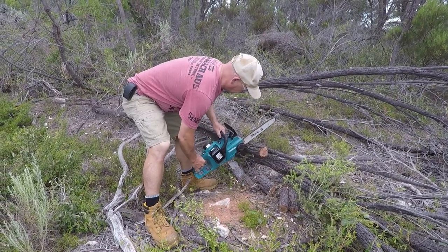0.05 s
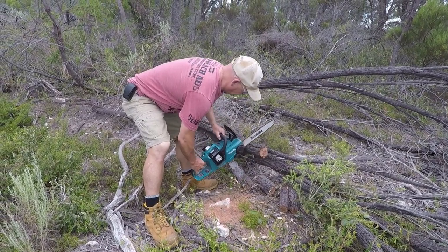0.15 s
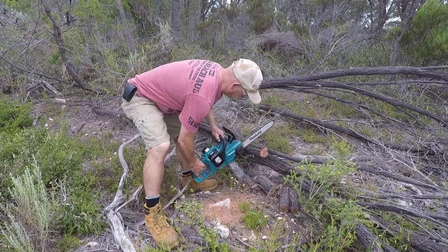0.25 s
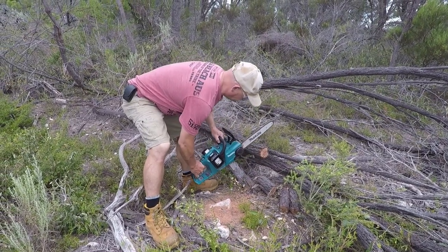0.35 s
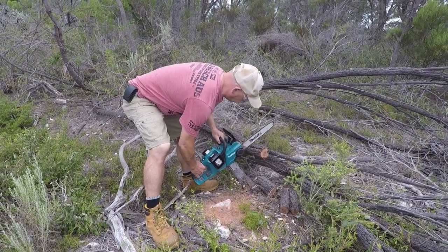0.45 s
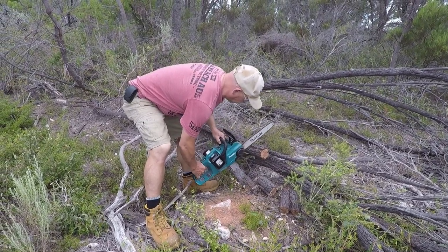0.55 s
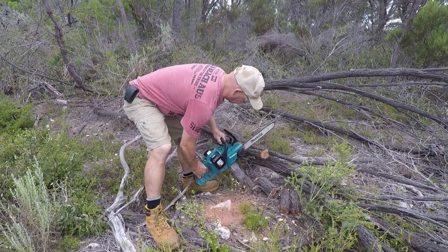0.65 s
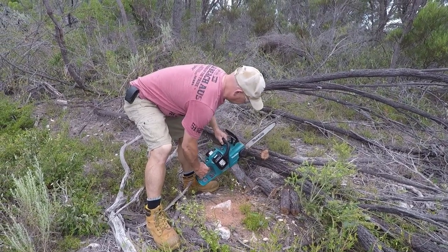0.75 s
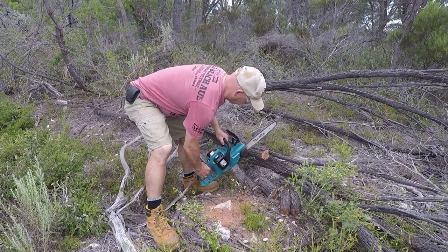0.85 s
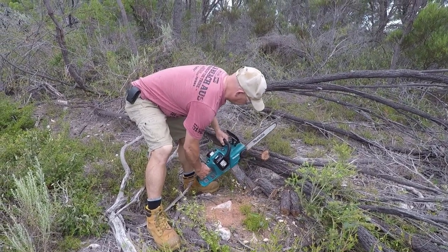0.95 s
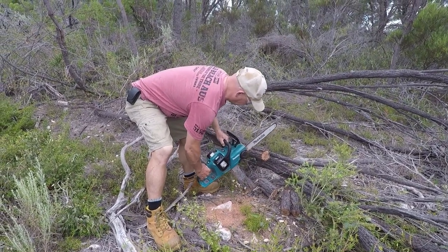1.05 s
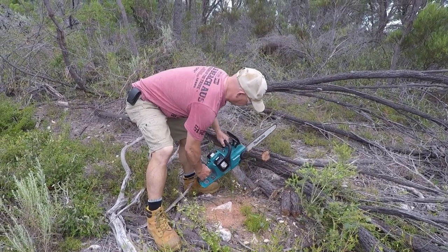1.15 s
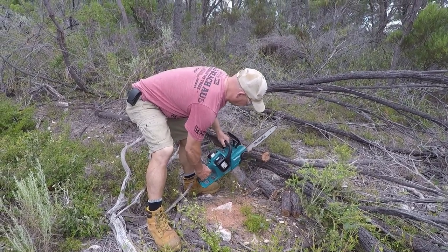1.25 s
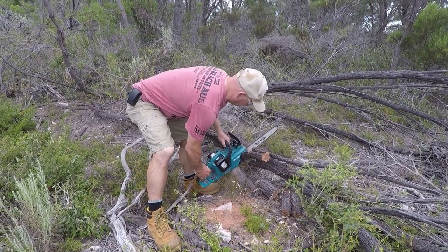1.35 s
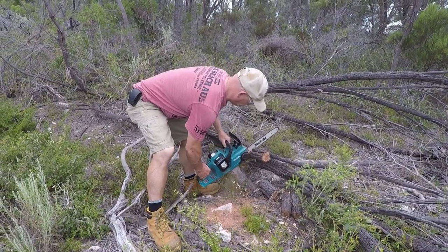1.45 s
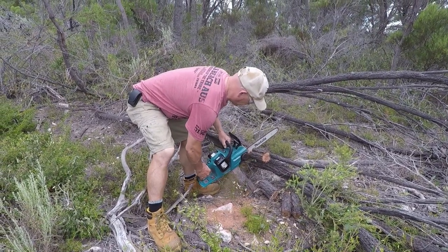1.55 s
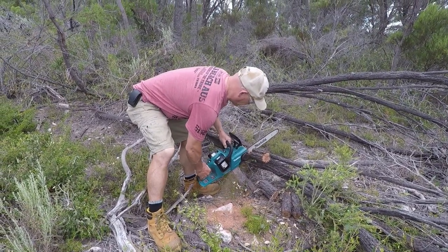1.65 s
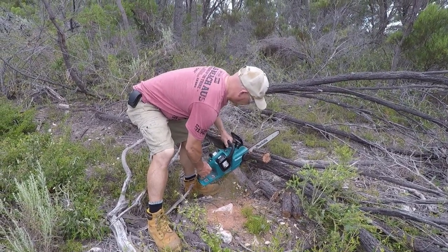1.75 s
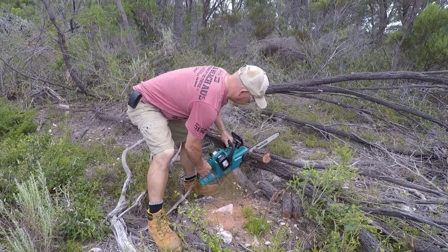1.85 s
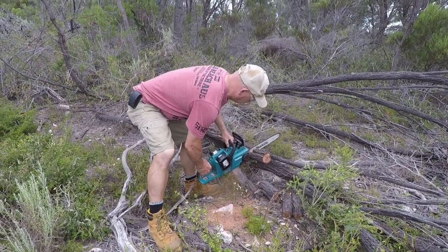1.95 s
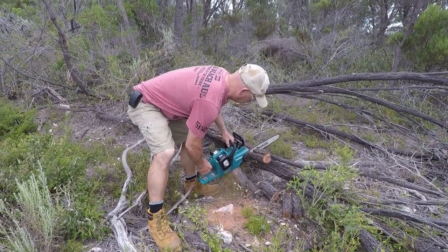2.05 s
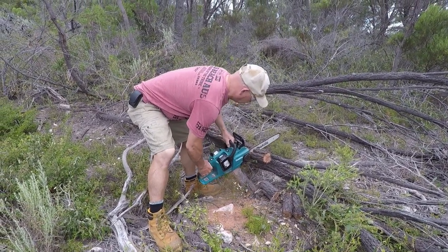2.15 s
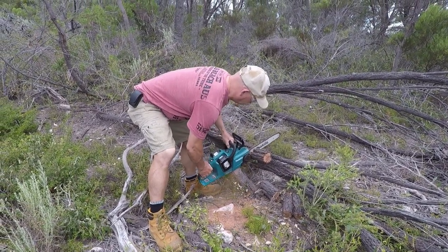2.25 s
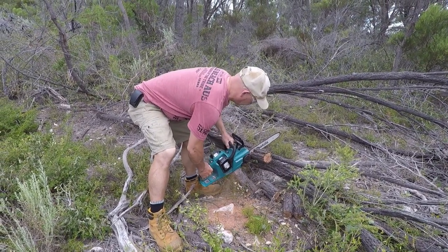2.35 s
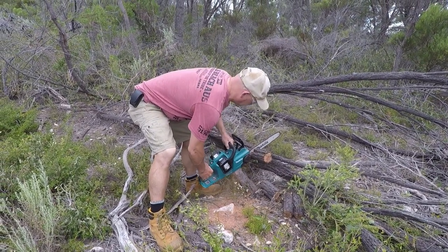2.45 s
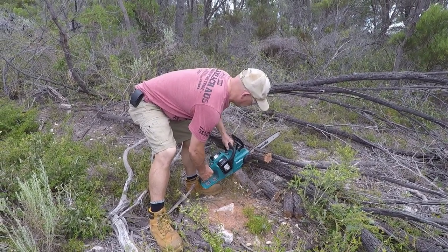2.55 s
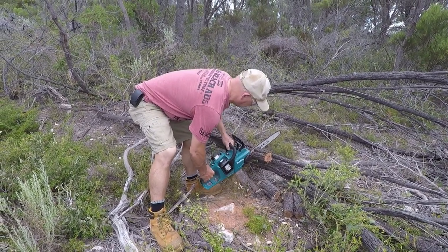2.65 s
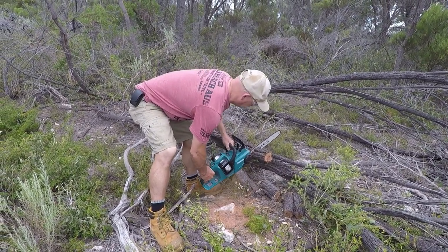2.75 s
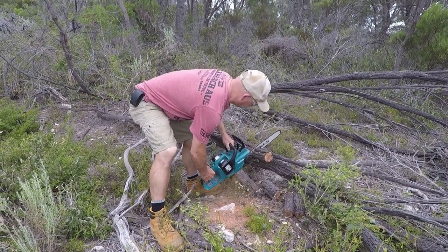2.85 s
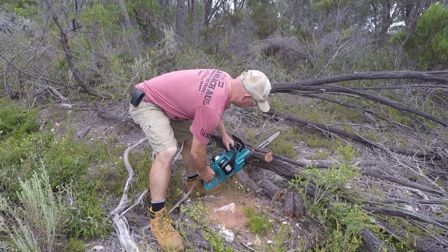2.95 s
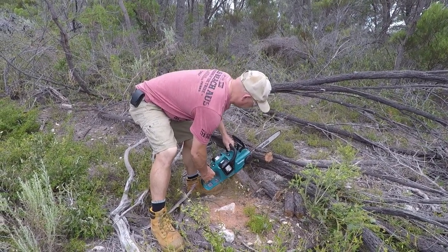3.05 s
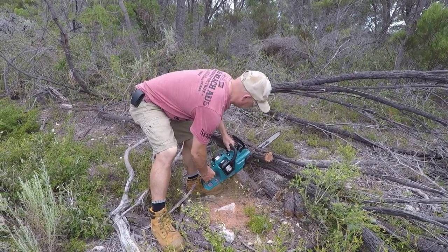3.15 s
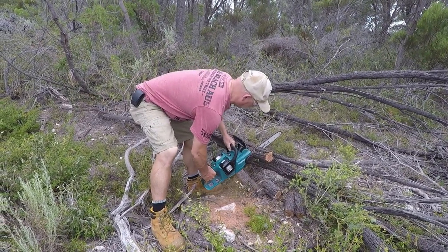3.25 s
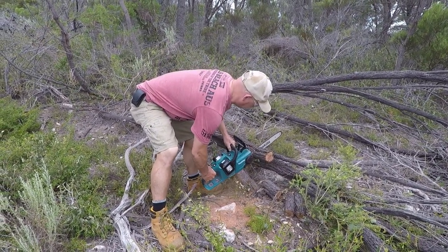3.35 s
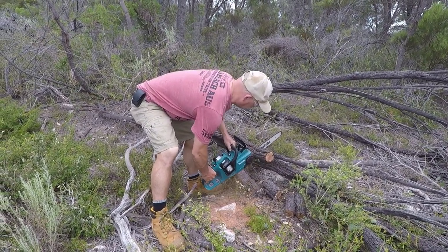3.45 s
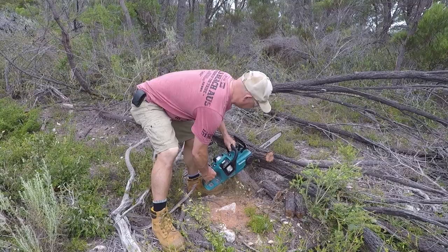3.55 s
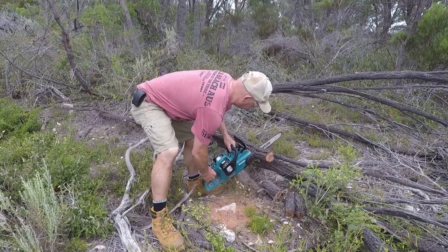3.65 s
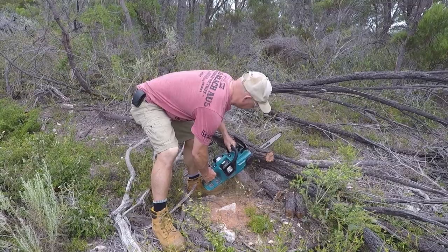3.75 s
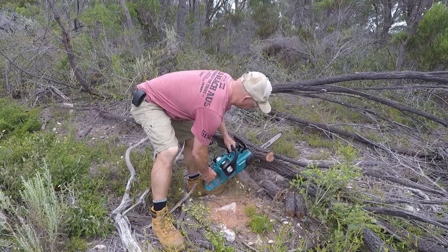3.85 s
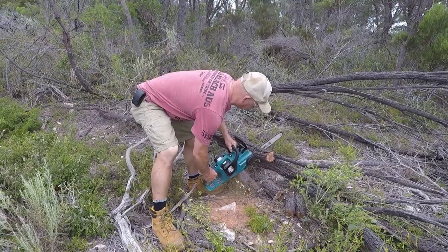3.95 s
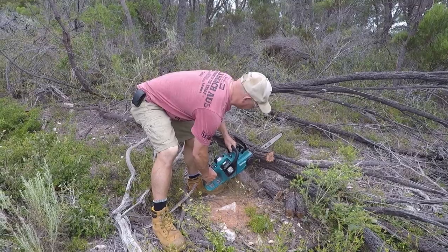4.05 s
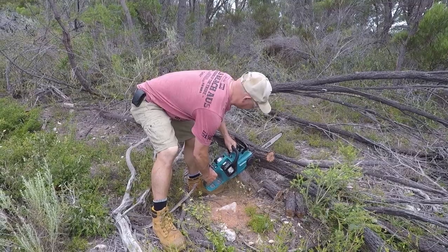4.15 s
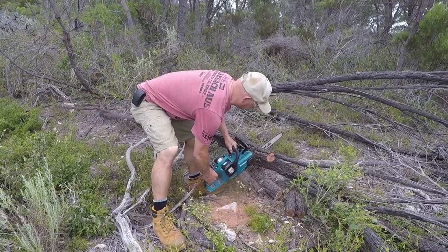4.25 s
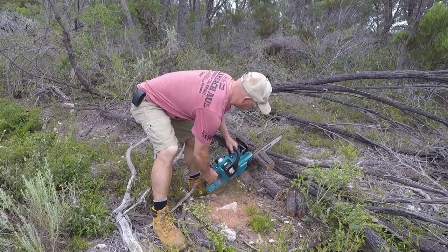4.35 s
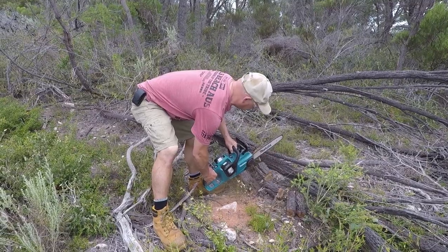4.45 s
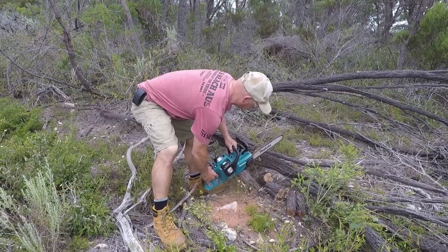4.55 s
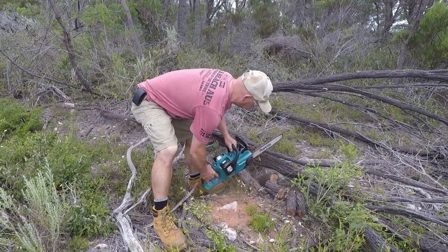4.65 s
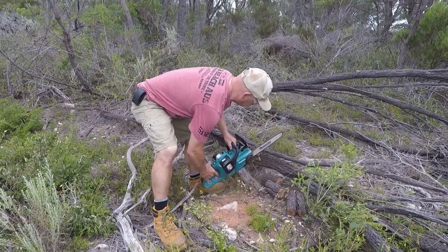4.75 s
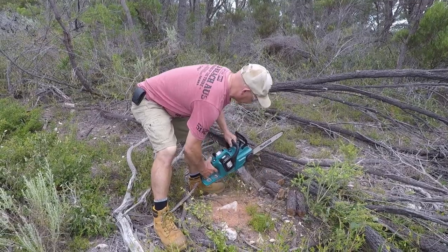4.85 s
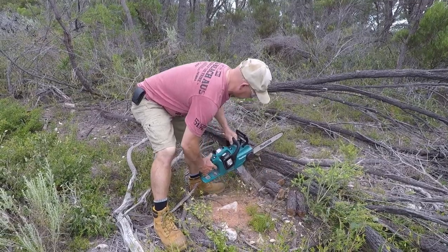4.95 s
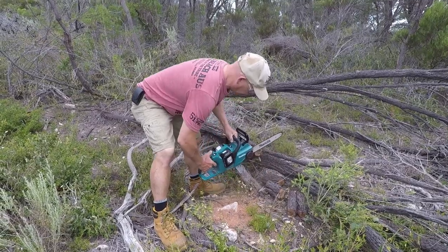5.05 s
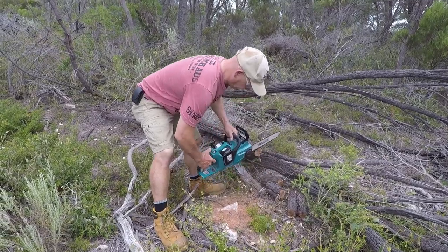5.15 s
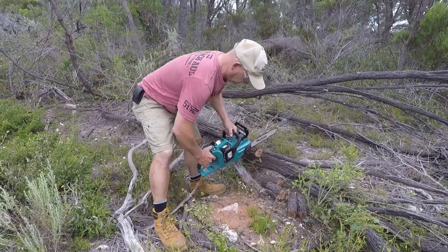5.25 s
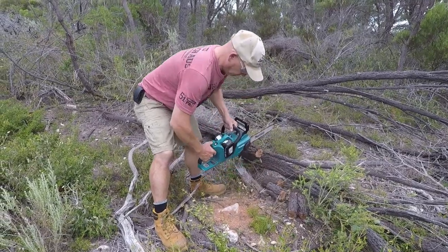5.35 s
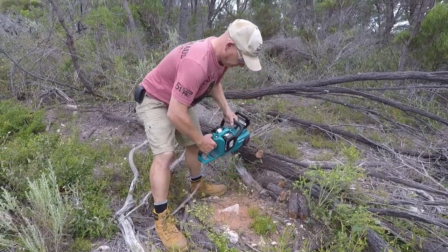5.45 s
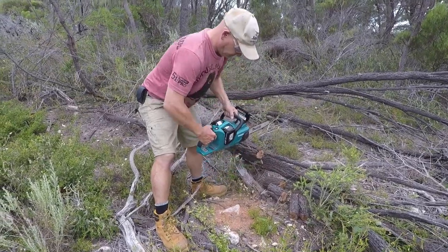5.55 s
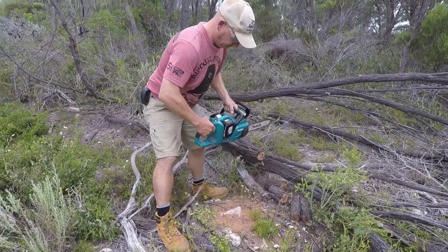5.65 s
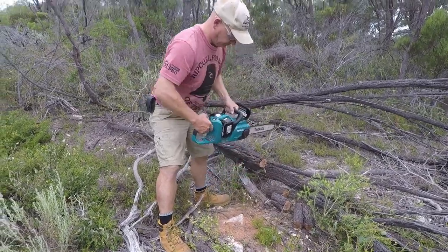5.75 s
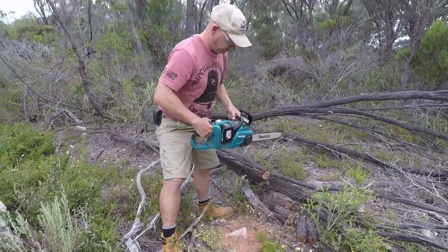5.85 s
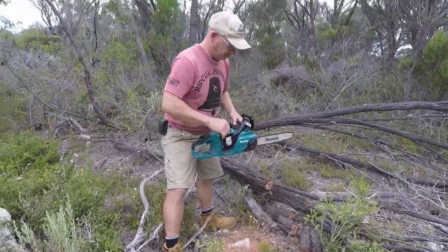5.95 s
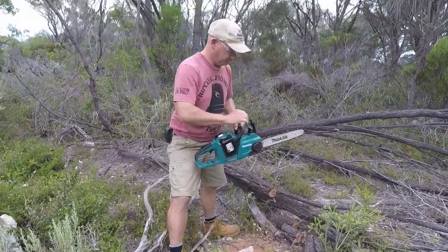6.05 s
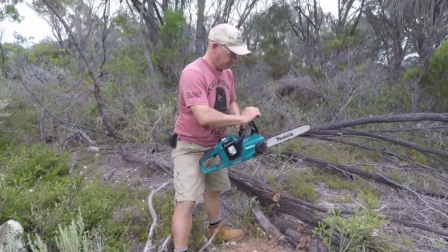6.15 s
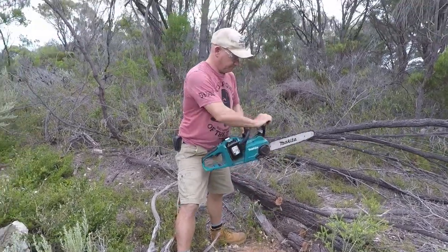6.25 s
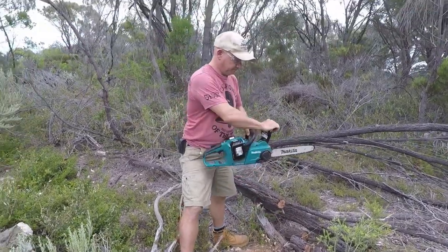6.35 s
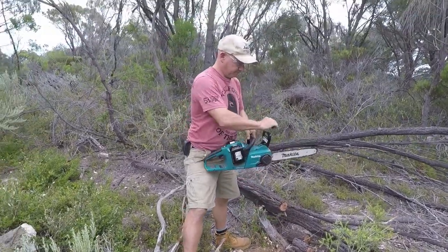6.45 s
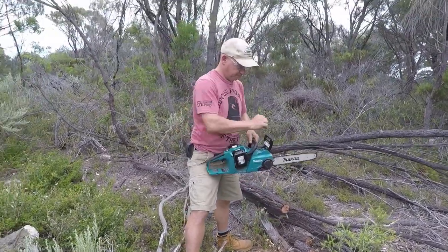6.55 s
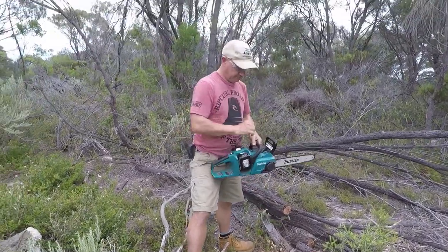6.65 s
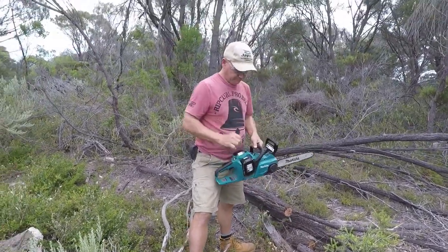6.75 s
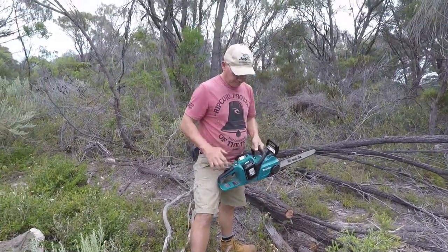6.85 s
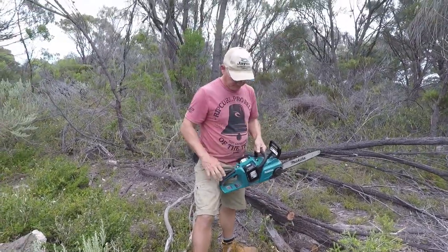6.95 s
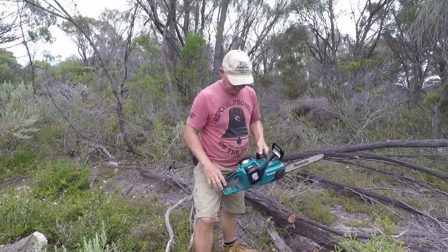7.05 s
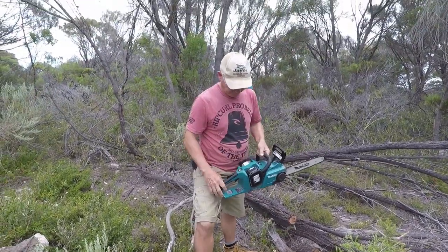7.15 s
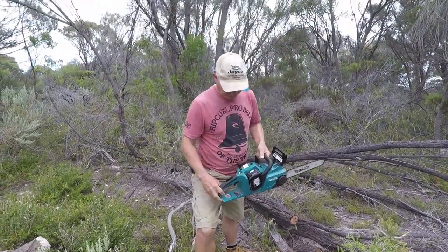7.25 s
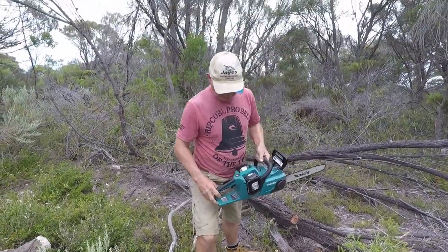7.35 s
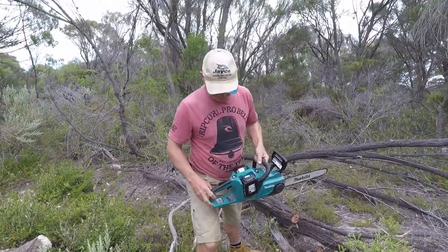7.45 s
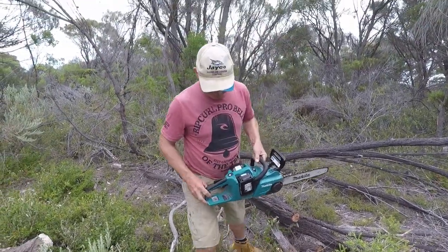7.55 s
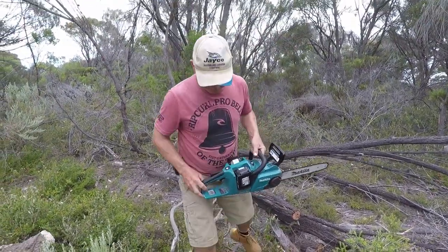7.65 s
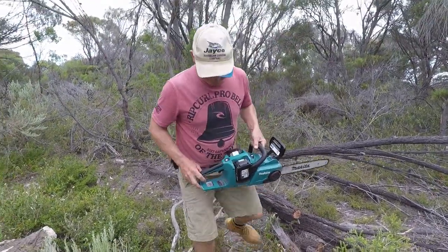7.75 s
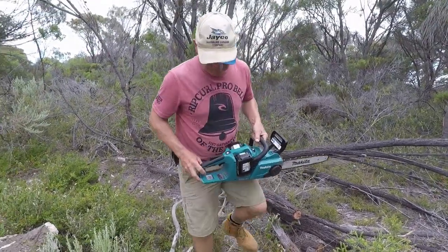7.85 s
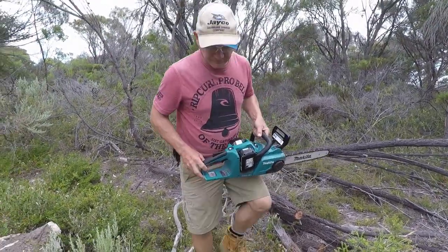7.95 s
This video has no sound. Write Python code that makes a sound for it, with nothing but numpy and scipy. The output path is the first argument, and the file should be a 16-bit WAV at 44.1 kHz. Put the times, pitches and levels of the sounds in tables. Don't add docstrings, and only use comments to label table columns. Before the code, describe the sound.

A battery chainsaw whines and tears through a dry branch, runs down to a stop, then its brake snaps and boots crackle on twigs.

```python
import sys
import numpy as np
from scipy import signal
from scipy.fft import rfft, irfft, next_fast_len
from scipy.io import wavfile

SR = 44100
rng = np.random.default_rng(int(sys.argv[2]) if len(sys.argv) > 2 else 0)


def nominal_scale(level):
    x = np.asarray(level, float) / 20
    return 10 ** x


def unload_wav(signal):
    wavfile.write(
        sys.argv[1],
        SR,
        np.round(np.clip(np.atleast_2d(signal).T, -1, 1) * 32767).astype(np.int16),
    )


N = 352794

# [s, cutters per s]
CHAIN_SPEED = [(0, 447.7), (.08, 493), (.29, 534.4), (.9, 530.2), (.97, 508.7), (1.198, 499),
               (1.319, 471.7), (1.56, 472), (1.66, 454.8), (1.749, 384.6), (2.11, 398.6), (2.23, 458),
               (2.33, 482.4), (2.56, 490), (3.199, 490), (3.63, 515.2), (4.251, 516), (4.515, 527)]
RELEASE_S = CHAIN_SPEED[-1][0]
STALL_S, STOP_S = 5.033, 5.115
FREE_HZ = 539
HZ = np.maximum(np.arange(next_fast_len(N) // 2 + 1) * SR / next_fast_len(N), 1)


def rms_one(x):
    return x / np.sqrt(np.mean(x ** 2) + 1e-20)


def in_time(rows):
    s, *columns = np.transpose(rows)
    return [np.interp(np.arange(N) / SR, s, c) for c in columns]


def gate(start, end, fade=0.0059):
    t = np.arange(N) / SR
    return np.clip(np.minimum(t - start + fade, end + fade - t) / fade, 0, 1)


def at_hz(points):
    hz, value = np.array(points)[:, 0], np.array(points)[:, 1]
    return np.interp(np.log(HZ), np.log(np.maximum(hz, 1)), value)


def bell(hz, centre, width):
    return np.exp(-((hz - centre) / width * 2) ** 2)


def to_hz(x):
    return rfft(x, next_fast_len(N))


def to_time(x):
    return irfft(x, next_fast_len(N))[..., :N]


def drift(rate):
    r = np.exp(-80 * np.pi * rate / SR)
    slow = signal.lfilter([1], [1, -2 * r, r * r], rng.standard_normal(N // 40 + 2002))[2000:]
    return np.interp(np.arange(N) / 40, np.arange(len(slow)), rms_one(slow))


def band(x, low_hz, high_hz):
    return signal.sosfilt(signal.butter(2, [low_hz, high_hz], "band", fs=SR, output="sos"), x)


def ring(clicks, hz, t60):
    r = nominal_scale(-60 / (t60 * SR))
    w = 2 * np.pi * hz / SR
    return signal.lfilter([0, np.sin(w)], [1, -2 * r * np.cos(w), r * r], clicks + 1e-18)


def grains(per_s, spread_db):
    sizes = nominal_scale(spread_db * np.minimum(rng.exponential(1, N), 5)) * rng.choice([-1, 1], N)
    return rms_one(sizes * (rng.random(N) < per_s / SR))


def narrow_pair(blur_hz):
    return signal.sosfilt(signal.butter(2, blur_hz, fs=SR, output="sos"), rng.standard_normal((2, N)))


def blurred(hz, blur_hz):
    phase = 2 * np.pi * np.cumsum(hz) / SR
    a, b = narrow_pair(blur_hz)
    return rms_one(a * np.cos(phase) + b * np.sin(phase))


def whistles(rows, fade, blur_hz):
    a, b = rms_one(narrow_pair(blur_hz))
    out = np.zeros(N)
    for start, end, hz, end_hz, db in rows:
        on = gate(start, end, fade)
        at = np.flatnonzero(on)
        p = 2 * np.pi * np.cumsum(np.interp(at / SR, [start, end], [hz, end_hz])) / SR
        out[at] += nominal_scale(db) * on[at] * (a[at] * np.cos(p) + b[at] * np.sin(p))
    return out


def ports(shared, own, alike):
    c = np.clip(at_hz(alike), -1, 1)
    return np.sqrt(1 + c) * shared / np.sqrt(2) + np.sqrt(1 - c) * own / np.sqrt(2) * [[1], [-1]]


def air():
    # [Hz, dB per Hz]
    spectrum = [(12, -57.5), (20, -48), (101, -42), (122, -26.5), (166, -3), (324, -30), (416, -22.5),
                (686, -28.5), (1010, -29), (1820, -34.5), (2400, -41.5), (10500, -46), (15500, -57)]
    # [Hz, -1 to 1]
    alike = [(300, 0.29), (1400, -0.87), (3100, 0.37), (6800, 0.076), (15000, -0.33)]
    pair = ports(*to_hz(rng.standard_normal((2, N))), alike) * nominal_scale(at_hz(spectrum))
    scale = np.sqrt(np.sum(abs(pair[:, HZ > 250]) ** 2)) / N
    chips_db = np.interp(np.arange(N) / SR, [5.3, 5.6], [2.5, 0])
    port_dip = np.clip(abs(HZ - 165) / 90, .2, 1)
    return nominal_scale(-50.5 + drift(0.92) + chips_db) * to_time(pair * port_dip) / scale


def wind():
    # [s, dB]
    gust_levels = [(0, -59), (1.6, -59), (1.9, -53.5), (2.6, -60), (3.2, -64), (4.4, -60), (4.6, -55),
                   (4.8, -61), (5.2, -54.5), (5.6, -52), (6.1, -46.5), (6.44, -50.5), (7.0, -51),
                   (7.46, -54), (8.0, -50.5)]
    # [s, dB]
    puff_events = [(5.326, -47), (5.36, -51), (5.463, -46), (5.51, -43), (5.569, -39.5), (5.669, -43),
                   (5.748, -43), (5.948, -26.5), (5.986, -32), (6.07, -43), (6.117, -35), (6.149, -34),
                   (6.204, -31), (6.244, -36), (6.30, -26.5), (6.341, -27), (6.439, -46), (6.545, -49),
                   (6.612, -44.5), (6.7, -49), (6.852, -43), (7.041, -43), (7.099, -48), (7.278, -51),
                   (7.307, -46), (7.632, -46), (7.677, -38), (7.703, -27), (7.746, -45), (7.84, -38),
                   (7.928, -38.5)]
    port_hz, port_width_hz = 161.6, 40
    lumpy = rng.standard_normal((2, N)) * nominal_scale(2.4 * drift(6.7))
    right, other = rms_one(band(lumpy, port_hz - port_width_hz / 2, port_hz + port_width_hz / 2))
    gusts = gate(gust_levels[0][0], gust_levels[-1][0], fade=0.15) * nominal_scale(in_time(gust_levels)[0] + 9.5)
    t, puffs = np.arange(-2000, 2000) / SR, np.zeros(N)
    for (s, db), wobble in zip(puff_events, rng.uniform(1.0, 1.05, len(puff_events))):
        tone = np.sin(2 * np.pi * port_hz * wobble * t)
        at = int(s * SR) + np.arange(len(t)) - len(t) // 2
        puffs[at] += nominal_scale(db + 11) * np.exp(-(t / 0.015) ** 2) * tone
    left = nominal_scale(-15.0) * gusts * (0.53 * other - 0.68 * right) - nominal_scale(-15.5) * np.roll(puffs, 20)
    return np.array([left, gusts * right + puffs])


def birds():
    # [s, s, Hz, Hz, dB]
    near = [
        (6.10, 6.13, 5200, 4500, -69),
        (6.155, 6.18, 5070, 4380, -65),
        (6.18, 6.2, 4380, 4800, -64),
    ]
    # [s, s, Hz, Hz, dB]
    far = [
        (5.15, 5.553, 3320, 3150, -67),
        (5.36, 5.48, 5750, 5950, -67),
        (7.66, 7.996, 3130, 3320, -63),
    ]
    calls = whistles(near, fade=.03, blur_hz=40) + whistles(far, fade=.03, blur_hz=60)
    return nominal_scale(-2.5 + 2.5 * drift(17)) * calls


def boots():
    # [s, dB, dB re peak, Hz]
    twigs = [(5.882, -31.5, 4, 646), (5.9757, -36.5, 8, 401), (6.669, -40, -6, 600), (6.7103, -25, -7, 565),
             (6.7394, -36, -1, 458), (6.797, -41, -4, 600), (6.8414, -42, -8, 401), (6.8987, -37, -6, 900),
             (6.916, -40, -8, 900), (6.9314, -30, -4, 1040), (6.9617, -31, -3, 800), (6.977, -33, 6.5, 700),
             (6.99, -33, 2, 700), (7.001, -26.5, -8, 530), (7.008, -31, -10, 600), (7.018, -31, -8, 600),
             (7.0325, -22, -1, 800), (7.045, -34.5, -4, 500), (7.069, -36, -2, 700), (7.092, -40, 2, 900),
             (7.116, -40, 0, 800), (7.1911, -45, -14, 549), (7.2345, -34, -14, 603), (7.2559, -43, -7, 506),
             (7.307, -36.5, 11, 649), (7.359, -26, -8, 800), (7.355, -28, -9, 832), (7.3995, -37, -8, 800),
             (7.4145, -34, -10, 800), (7.4289, -29, -10, 900), (7.441, -24, -2.5, 1490),
             (7.458, -31.5, -2, 2000), (7.4667, -24, 4, 1000), (7.4728, -24.5, -14, 900),
             (7.486, -28, -5, 700), (7.529, -30, -6, 1200), (7.519, -30.5, 3, 670), (7.5667, -43, -13, 624),
             (7.5957, -20.5, -13, 1200), (7.631, -34, 2, 1700), (7.621, -34, -6, 1580),
             (7.663, -33, 4, 415), (7.7598, -33, -5, 487), (7.8042, -35, 0, 557), (7.854, -39, -8, 500),
             (7.986, -31.5, -20, 525)]
    # [s, dB, dB]
    litter = [(5.9, -59, -59), (6.72, -54.5, -56), (6.92, -66, -58), (6.99, -52, -54), (7.1, -58, -55),
              (7.27, -60, -69), (7.37, -68, -59), (7.47, -41, -47), (7.55, -57, -66), (7.63, -51, -51),
              (7.8, -57, -58), (7.95, -57, -54.5)]
    press_db_per_s, lift_db_per_s = 128, 156
    out, t = np.zeros(N), np.arange(1500) / SR
    for (s, db, knock_db, hz), noise in zip(twigs, rng.standard_normal((len(twigs), 1500))):
        snap = rms_one(band(noise, 3360, 6700))
        snap += nominal_scale(knock_db + 6.5) * rms_one(band(noise, 0.58 * hz, 1.06 * hz))
        snap += nominal_scale(-18.0) * rms_one(band(noise, 7750, 14500))
        i = int(s * SR)
        out[i:i + 1500] += (nominal_scale(db - 11.5 - 60 * t / 0.013) * snap)[:N - i]
    crackle = rms_one(band(grains(4000, spread_db=4.5) * nominal_scale(2.3 * drift(40)), 5050, 6800))
    crunch = rms_one(band(grains(1600, spread_db=3.0), 220, 2400))
    for s, db, crunch_db in litter:
        since = np.arange(N) / SR - s
        press = nominal_scale(np.where(since < 0, press_db_per_s * since, -lift_db_per_s * since))
        out += press * (nominal_scale(db - 5.5) * crackle + nominal_scale(crunch_db - 5.0) * crunch)
    return np.array([out, 1.62 * out + .5 * np.roll(out, 37)])


def brake():
    # [s, dB, dB per octave]
    contacts = [
        (6.2158, -22.5, 1),
        (6.228, -1, -1),
        (6.2309, -15.5, -3),
        (6.2341, -10, 0.5),
        (6.2365, -15.5, -3.5),
        (6.241, -16, -4.5),
        (6.249, -17, -1.5),
        (6.254, -14, 8),
        (6.261, -20, -3.5),
    ]
    # [Hz, dB, s]
    modes = [(208, -16.5, 0.046), (354, -16.5, 0.04), (516, -20, 0.056), (790, -16.5, 0.037),
             (1124, -8, 0.04), (1520, -19, .09), (1580, 2, 0.015), (1900, -17, .08), (2000, 6, .008),
             (2500, 4.5, 0.0065), (3640, 0.5, 0.01), (4800, -0.5, 0.008), (6300, 3.5, 0.0078),
             (9250, -24, 0.0069)]
    # [Hz, Hz, dB, s]
    echoes = [(1600, 1800, -36.5, 0.57), (3500, 1700, -36, 0.18), (6050, 700, -30, 0.3),
              (4900, 500, -34, 0.27), (5830, 2400, -34.5, 0.39)]
    s, peak_db, bright_db = np.transpose(contacts)
    at, clicks, out = (s * SR).astype(int), np.zeros(N), np.zeros(N)
    for hz, db, t60 in modes:
        mode_db = peak_db + db - 12.5 + bright_db * np.log2(hz / 5000) + rng.normal(0, 1.3, len(at))
        clicks[at] = nominal_scale(mode_db) * rng.choice([-1, 1], len(at))
        out += ring(clicks, hz, t60)
    clicks[at] = nominal_scale(peak_db)
    crack = signal.lfilter([1], [1, -nominal_scale(-60 / (0.023 * SR))], clicks)
    out += nominal_scale(-4.5) * crack * band(rng.standard_normal(N), 790, 6000)
    since = np.arange(N) / SR - contacts[1][0]
    wash = 0
    for hz, width, db, t60 in echoes:
        noise = rms_one(band(rng.standard_normal((2, N)), hz - width / 2, hz + width / 2))
        wash = wash + nominal_scale(db - 60 * np.abs(since) / t60) * (since > 0) * noise
    return out * nominal_scale([[-1.5], [1.5]]) + wash


def speed():
    # [s, Hz]
    bites = [
        (0.841, 7),
        (1.3, 9.8),
        (1.94, 12.3),
        (2.702, 43),
        (3.261, 26),
        (3.96, 35.3),
    ]
    fall_s, recover_s = .04, .08
    t = np.arange(N) / SR
    sag = sum(hz * np.exp(np.where(t < s, (t - s) / fall_s, (s - t) / recover_s)) for s, hz in bites)
    coasting_s = np.maximum(t - RELEASE_S, 0)
    coast = 620 * coasting_s + 300 * coasting_s ** 3
    coast += 6 * gate(RELEASE_S + 0.0405, 9, fade=0.04)
    cutter_hz = np.maximum(in_time(CHAIN_SPEED)[0] - sag - coast, 30)
    return cutter_hz, sag, gate(-1, RELEASE_S, fade=0.044)


def whine(cutter_hz, sag, held):
    # [s, s, Hz, Hz, dB]
    open_resonances = [(0, 1.24, 540, 300, -32), (1.27, 1.42, 475, 150, -29), (1.45, 1.7, 470, 150, -27.5),
                       (1.73, 2.69, 472, 165, -28.5), (2.72, 3.31, 470, 170, -29),
                       (3.34, 3.8, 500, 160, -29), (3.83, 4.38, 500, 160, -27), (4.41, 4.55, 500, 200, -31),
                       (0, .2, 1030, 500, -32), (.23, .62, 1060, 500, -30.5), (.65, 1.27, 1032, 500, -34.5),
                       (1.3, 2.67, 930, 400, -33), (2.7, 4.51, 1048, 300, -36.5),
                       (0, .07, 4700, 600, -28.5), (.1, .25, 5050, 550, -26.5), (.28, .42, 5340, 450, -32),
                       (.45, .93, 5340, 450, -36.5), (.05, .86, 2100, 500, -44), (.28, .7, 3750, 700, -37),
                       (.3, .47, 3210, 300, -36), (.5, .85, 5850, 300, -37), (.25, .6, 4280, 300, -40),
                       (.95, .99, 3080, 500, -29), (1.02, 1.09, 3050, 500, -32),
                       (.95, 1.1, 4630, 1600, -38.5), (1.05, 1.22, 2520, 400, -36),
                       (1.73, 1.8, 1563, 350, -33), (1.86, 2.0, 1540, 350, -31.5),
                       (2.03, 2.14, 1590, 350, -35), (2.17, 2.24, 1900, 900, -33.5),
                       (2.3, 2.72, 1900, 400, -39), (2.3, 2.56, 2420, 400, -38),
                       (3.13, 3.24, 2440, 400, -36), (2.27, 2.52, 1440, 250, -38),
                       (2.95, 3.2, 1480, 300, -37), (3.37, 3.86, 5100, 450, -37),
                       (3.56, 3.85, 4630, 300, -36), (3.5, 3.66, 4100, 300, -41),
                       (3.69, 3.81, 4120, 300, -33.5), (3.45, 3.7, 3580, 300, -42),
                       (3.71, 3.8, 6180, 300, -33), (3.98, 4.38, 3580, 400, -34),
                       (4.16, 4.36, 3100, 300, -35.5), (3.97, 4.2, 4050, 400, -38),
                       (3.97, 4.5, 5150, 700, -39.5)]
    # [multiple of cutter rate, dB]
    coasting = [(1, -26), (2, -26.5), (3, -36), (4, -24), (5, -36), (6, -27), (8, -32), (10, -34)]
    # [Hz, Hz, dB]
    coast_rings = [(1335, 190, -1), (1850, 280, -3), (1620, 200, -9), (1060, 220, -9), (790, 330, -13),
                   (510, 150, -10), (3500, 600, -4)]
    phase = 2 * np.pi * np.cumsum(cutter_hz * (1 + 0.001395 * drift(29.1))) / SR
    driven = nominal_scale(-14.5) * np.sin(phase * 2 / 3) + nominal_scale(-10.5) * np.sin(phase * 5 / 3)
    driven += nominal_scale(-12) * np.sin(phase * 4 / 3)
    shaft = nominal_scale(-4.0) * np.sin(phase / 3) + held * driven
    octaves = np.log2(cutter_hz / FREE_HZ)
    out = nominal_scale(-35 + 19.5 * octaves - 66 * octaves ** 2 + 1.75 * drift(8.9)) * shaft

    slow = np.arange(0, N, 64)
    steady = held + .8 * (1 - held)
    resonances = open_resonances
    spells = [gate(start, end, fade=0.031)[slow] for start, end, *_ in resonances]
    unload_s = .065
    free = gate(RELEASE_S + unload_s, 9, fade=unload_s - .02)[slow]
    for k in range(1, 13):
        hz = k * cutter_hz[slow]
        level = sum(on * nominal_scale(db) * bell(hz, centre, width)
                    for on, (_, _, centre, width, db) in zip(spells, resonances))
        if k == 1:
            level = level * nominal_scale(0.06 * sag[slow])
        level += nominal_scale(-40) * held[slow] * (2 < k < 12)
        rings = nominal_scale(-17) * np.clip(np.minimum(hz - 400, 2400 - hz) / 200, 0, 1)
        rings = rings + sum(nominal_scale(db) * bell(hz, centre, width) for centre, width, db in coast_rings)
        for order, db in coasting:
            level += (order == k) * free * nominal_scale(db) * rings
        flicker_db = 1.2 if k == 1 else 1.5 if k in (2, 10) else 2.4
        rasp_db = 2 * (k > 2)
        flicker = nominal_scale(steady * (flicker_db * drift(24.385) + rasp_db * drift(90)))
        out += np.interp(np.arange(N), slow, level) * flicker * np.sin(k * phase + k * k)
    return np.sqrt(2) * out * gate(0, STALL_S, fade=0.082), phase


def bouncing():
    # [s, dB]
    landings = [(0.7472, -5), (0.7641, -4), (0.7811, -7), (0.7986, -6), (0.8699, -5), (0.9033, -7),
                (0.9204, -8), (0.9881, -9), (1.0004, -11), (1.0126, -8), (1.0314, -11), (1.05, -10),
                (1.0654, -10), (1.0799, -8), (1.0934, -8), (1.1039, -8), (1.1173, -5), (1.1294, -10),
                (1.1418, -8), (1.1682, -6), (1.1847, -9), (1.1981, -9), (1.239, -9), (1.7921, -9),
                (1.9912, -9), (2.0186, -8), (3.1525, -6)]
    # [s, s, dB]
    lifts = [
        (.752, .815, -4),
        (.99, 1.235, -2.5),
        (1.78, 2.03, -.3),
    ]
    s, db = np.transpose(landings)
    clicks = np.zeros(N)
    clicks[(s * SR).astype(int)] = nominal_scale(db)
    jolt = signal.lfilter([1], [1, -nominal_scale(-60 / (.022 * SR))], clicks + 1e-18)
    turn = np.pi * np.cumsum(61.3 * (1 + 0.122 * drift(12.8))) / SR
    lifted_db = 2.4 * np.cos(turn) ** 4
    lifted_db = lifted_db + sum(db * gate(start, end, fade=0.013) for start, end, db in lifts)
    knock = ring(clicks, 6000, .008) - ring(clicks, 4700, .008) + .5 * ring(clicks, 3300, .01)
    return nominal_scale(lifted_db) + nominal_scale(9) * jolt, nominal_scale(-7) * knock


def tearing(phase, bounce, cutter_hz, held):
    # [s, dB]
    feed = [(0.0, -15.5), (0.05, -18), (0.7, -17), (.76, -20), (0.84, -23.5), (0.87, -19.5), (1.89, -17.5),
            (3.18, -18.5), (3.33, -19.5), (3.54, -18.5), (4.55, -19)]
    # [Hz, dB per Hz]
    spectrum = [(130, -46), (220, -38.5), (456, -9), (499, -11), (725, -18), (1040, -7), (6030, -7.5),
                (8310, -8.5), (12700, -26), (14200, -22.5), (15500, -41.5)]
    # [Hz, Hz, dB]
    colour_bumps = [(1050, 44.4, 3.5), (1786, 330, 3), (2360, 690, -2), (4000, 370, -1), (6210, 1360, 2.5),
                    (8350, 1760, -7.5), (8300, 285, -11), (11000, 2400, -3.5), (12530, 1500, 4.5)]
    # [s, s, Hz,
    # octaves, dB]
    shading = [(.1, .68, 2350, 0.18, -0.5), (0.96, 1.3, 11000, 0.98, -1.5), (0.93, 1.05, 2000, 0.24, -3),
               (1.76, 2.1, 1220, .3, -4), (1.65, 2.05, 1659, 0.26, -1), (.2, .7, 560, .3, -6),
               (1.9, 2.2, 3300, .3, -2.5), (1.7, 2.15, 7000, 0.34, -1), (2.4, 2.8, 400, 0.34, 2),
               (4.63, 4.76, 1020, 0.41, -5), (1.8, 2.4, 4700, 0.48, -1.5), (2.57, 2.95, 2350, 0.24, -1),
               (3.23, 3.4, 4800, 0.23, 0), (4.2, 5.1, 4700, 0.29, -1.5), (4.55, 5.14, 2350, 0.25, 0)]
    # [s, s, 0-1]
    notch_spans = [
        (.12, .62, 0.53),
        (.72, 1.1, 0.21),
        (2.602, 3.3, 0.17),
        (4.6, 5.1, 0.27),
    ]
    slowed = np.minimum(np.log2(FREE_HZ / cutter_hz), 2.3)
    tear_db = in_time(feed)[0] - 3.5 * abs(slowed) ** 1.03 * (1 - held)
    tear_db -= 188.5 * np.maximum(np.arange(N) / SR - STALL_S, 0)
    body_db = -1.78 + slowed * (held * 7 + (1 - held) * 5)

    pulse = bounce * nominal_scale(1.7 * np.cos(phase) + 0.24 * drift(178))
    bumps_db = sum(db * bell(HZ, hz, width) for hz, width, db in colour_bumps)
    fibres = [grains(14000, spread_db=1.56) * pulse, rng.standard_normal(N) * pulse]
    colour = to_hz(fibres) * nominal_scale(at_hz(spectrum) + bumps_db)
    scale = np.sqrt(np.sum(abs(colour[0, (HZ > 2200) & (HZ < 7500)]) ** 2) * 2) / N

    centres = np.geomspace(300, 13000, num=12)
    shared, own = 0, 0
    shades = [(gate(start, end, fade=0.042), hz, octaves, db) for start, end, hz, octaves, db in shading]
    for k, hz in enumerate(centres):
        share = np.interp(np.log(HZ), np.log(centres), np.arange(12) == k)
        a, b = to_time(colour * share) / scale
        tilt_db = body_db if hz < 2200 else 0.5 * (1 - held) * (hz > 7700)
        for on, centre, octaves, db in shades:
            distance = np.log2(hz / centre)
            if abs(distance) < 1:
                tilt_db = tilt_db + on * db * np.exp(-(distance / octaves) ** 2)
        patchy_db = 0.8 * drift(5.3) + 0.53 * drift(25)
        gain = nominal_scale(tear_db + tilt_db - 0.52 + patchy_db) * gate(0, STOP_S, fade=0.035)
        shared, own = shared + gain * a, own + gain * b
    depth = sum(share * gate(start, end, fade=.08) for start, end, share in notch_spans)
    return shared - depth * to_time(to_hz(shared) * bell(HZ, 2330, 380)), own


def saw():
    # [Hz, 0-1]
    alike = [(60, 0.5), (170, 0.4), (350, 1), (700, 1), (1400, 0.84), (3000, 0.94), (5600, 0.95),
             (8300, 0.13), (10500, 0.67), (12500, 0.65)]
    # [Hz, left minus right dB]
    balance = [(60, 0.0), (92, -0.5), (140, -1.0), (210, -1.5), (330, -1.5), (500, -2.5), (770, -4.0),
               (1170, -3.5), (1790, 0.0), (2740, -1.0), (4190, 0.0), (6410, 2.0), (9810, -5.0),
               (15000, 0.5)]
    # [Hz, radians left leads]
    lead = [(0, 0), (1550, 0.7), (2580, 0.1), (5170, -0.1), (5940, 0.4), (6460, 0.1), (7490, 1.1),
            (8100, 2.9), (8610, 2.9), (9560, 4.3), (10200, 4.0), (11100, 0.4), (11400, 0.0), (15400, -0.2)]
    # [s, Hz, dB]
    bar_ring = [(0.0, 3240, -33), (0.64, 3324, -32), (0.97, 3105, -35), (1.41, 3090, -27.5),
                (2.56, 3309, -29), (4.6, 3553, -28), (4.999, 3136, -33.5)]
    # [s, s, Hz, Hz, dB]
    squeal = [
        (1.03, 1.17, 5130, 5220, -28.5),
        (1.3, 2.1, 5500, 5450, -35),
        (4.2, 4.55, 6200, 6250, -31),
        (4.25, 4.29, 5690, 5670, -28),
        (2.4, 3.3, 5800, 5800, -34),
        (4.72, 4.88, 1800, 1750, -33),
    ]
    cutter_hz, sag, held = speed()
    tones, phase = whine(cutter_hz, sag, held)
    bounce, knock = bouncing()
    shared, own = tearing(phase, bounce, cutter_hz, held)
    bar_hz, bar_db = in_time(bar_ring)
    bar = nominal_scale(bar_db + 2.0 * drift(30)) * blurred(bar_hz, blur_hz=246) * gate(0, bar_ring[-1][0], fade=0.14)
    rubbing = bar + whistles(squeal, fade=0.044, blur_hz=80)
    tones = knock + tones * (1 + bounce) / 2 + bounce * rubbing
    pair = ports(to_hz(shared), to_hz(own), alike) + to_hz(tones)
    side = nominal_scale(at_hz(balance) / 2) * np.exp(.5j * np.interp(HZ, *np.transpose(lead)))
    return to_time(pair * [side, 1 / side]) * gate(0, 5.4)


def scene():
    dulling = signal.butter(4, 7800, fs=SR, output="sos")
    knocks = signal.sosfilt(dulling, brake()) + boots()
    bass_cut = signal.butter(4, 135, "high", fs=SR, output="sos")
    return signal.sosfilt(bass_cut, saw() + knocks + birds() + wind()) + air()


def band_limit(x):
    return signal.sosfilt(signal.butter(12, 15890, fs=SR, output="sos"), x)


def record(dry):
    rounded = 1.2 * np.tanh(dry / 1.2)
    return band_limit(rounded)


dry = scene()
out = record(dry)
unload_wav(out)
```